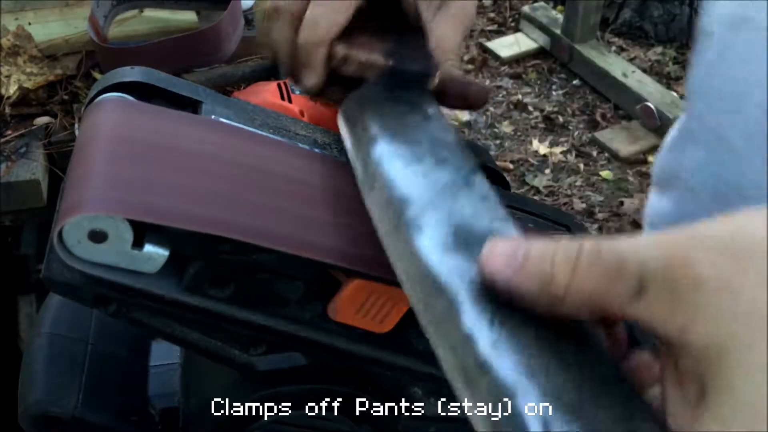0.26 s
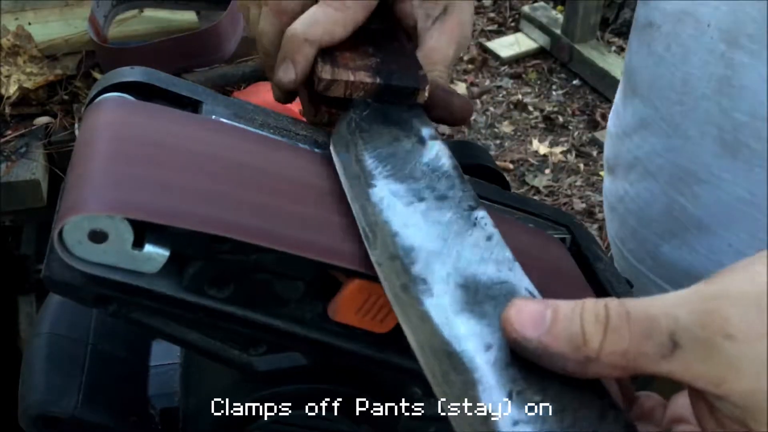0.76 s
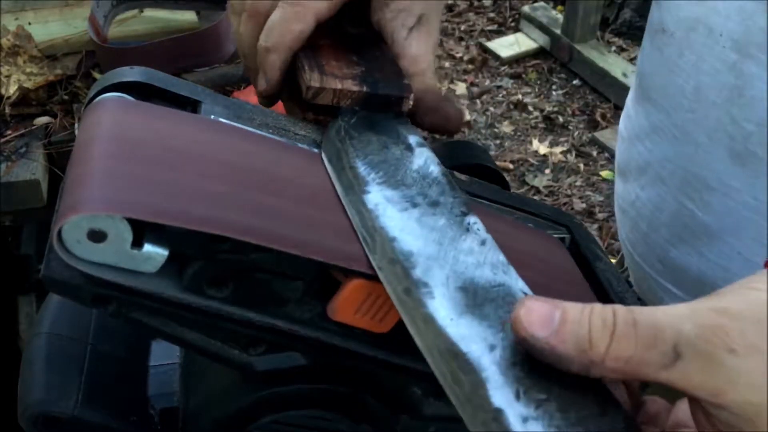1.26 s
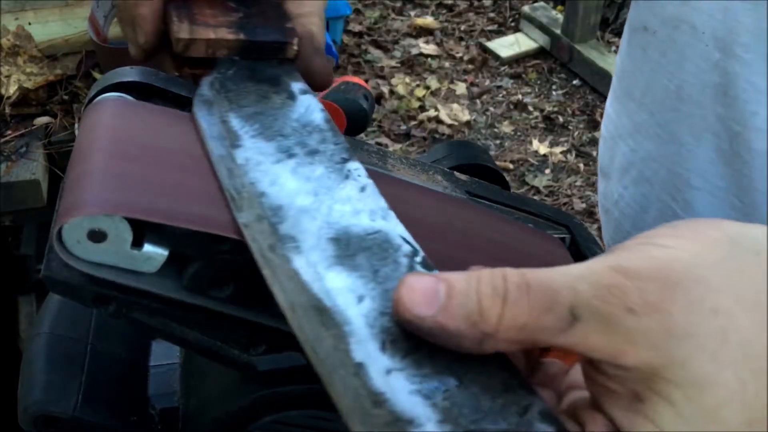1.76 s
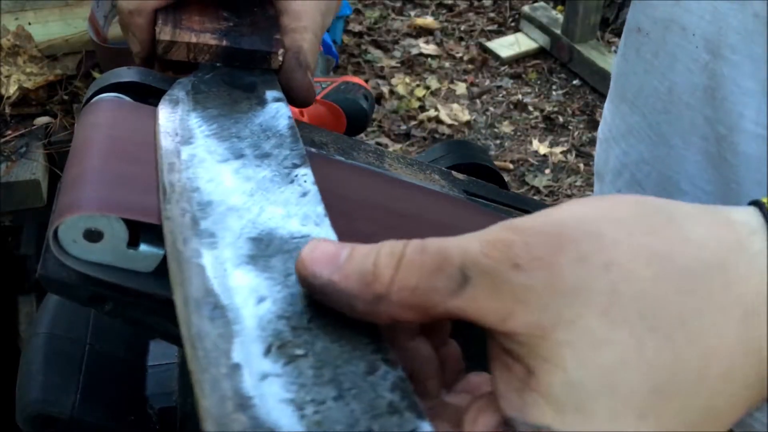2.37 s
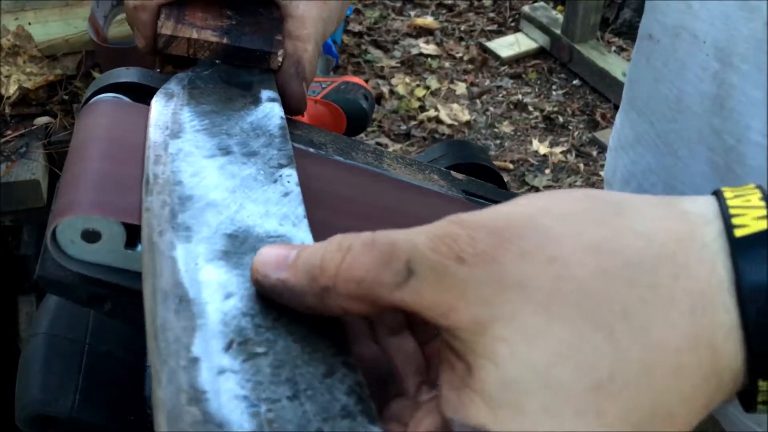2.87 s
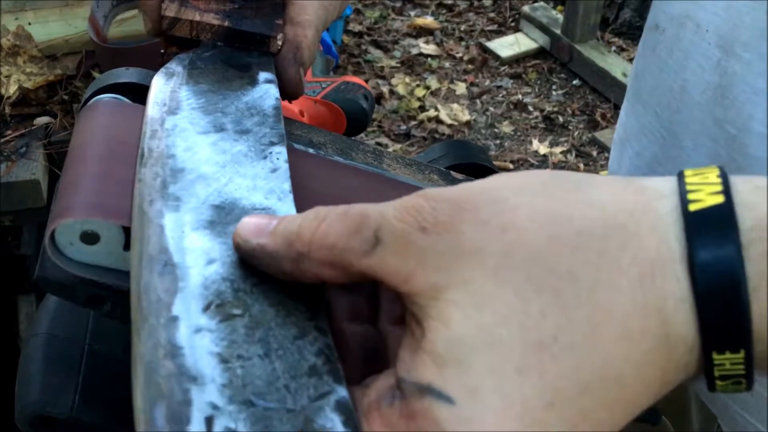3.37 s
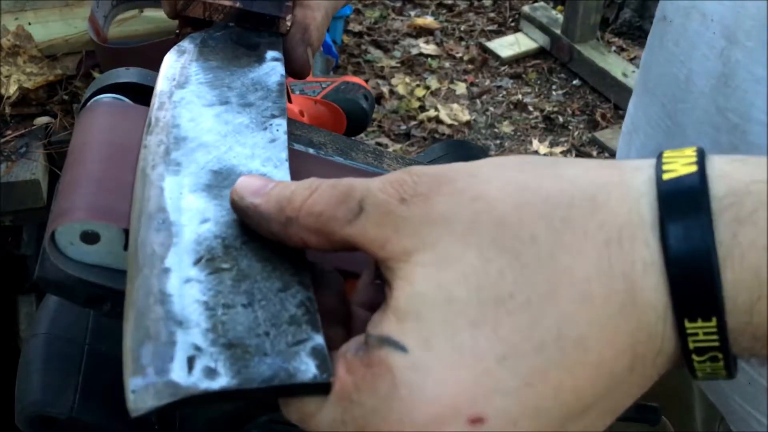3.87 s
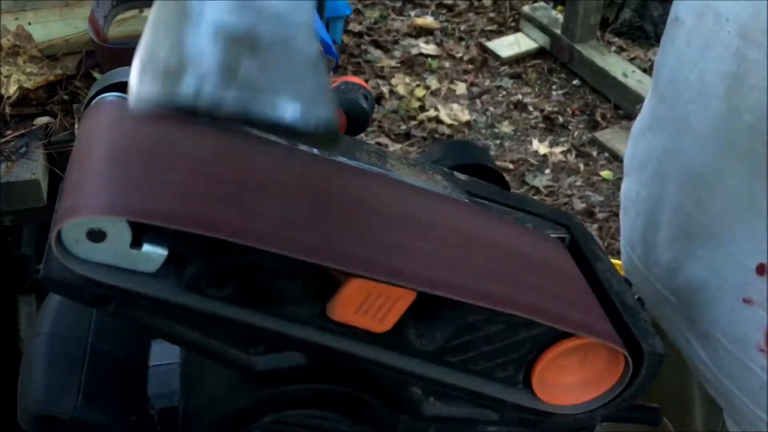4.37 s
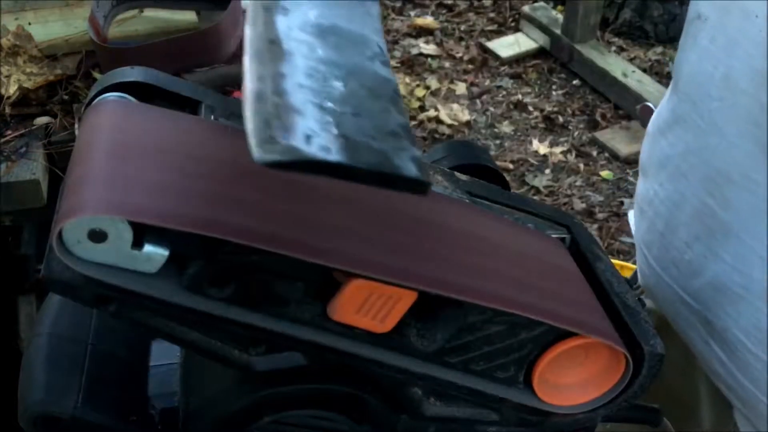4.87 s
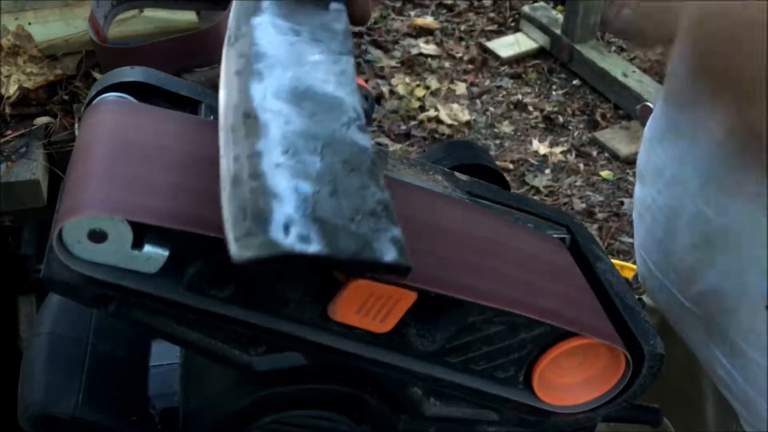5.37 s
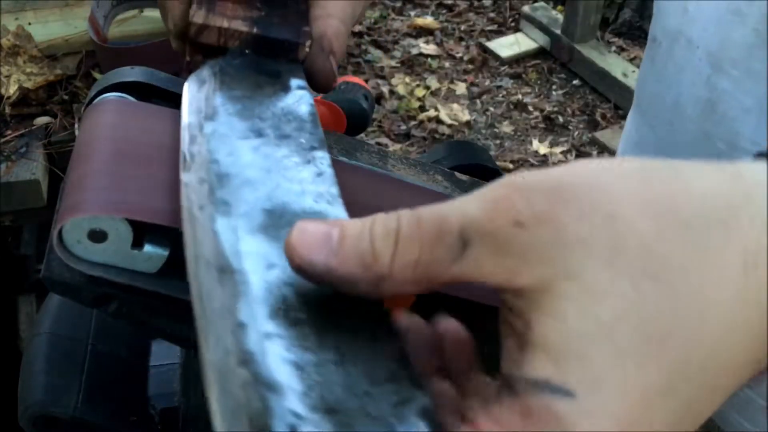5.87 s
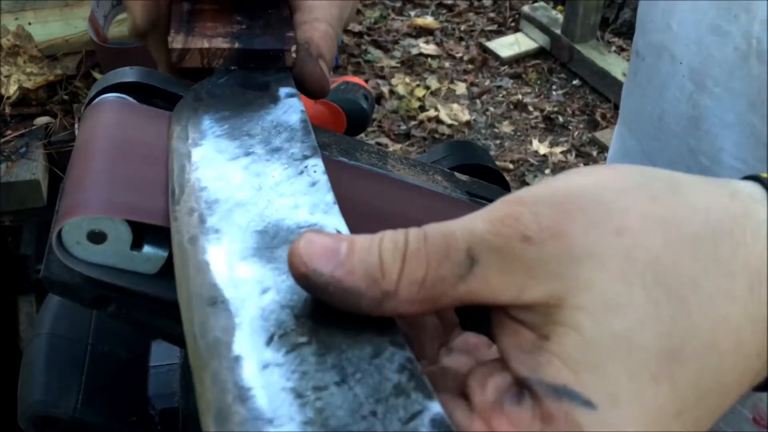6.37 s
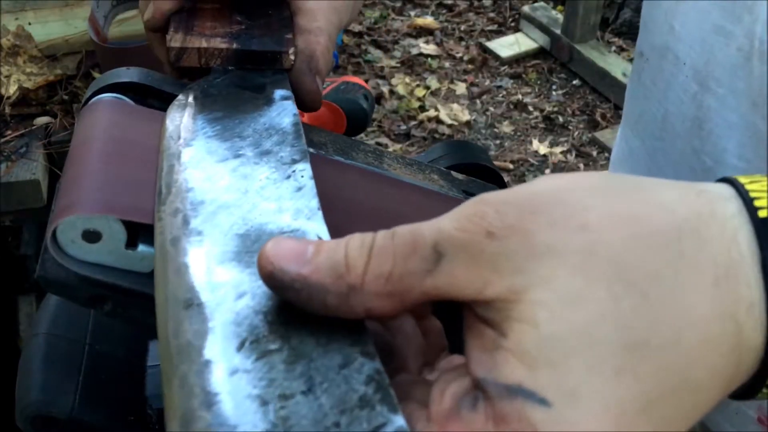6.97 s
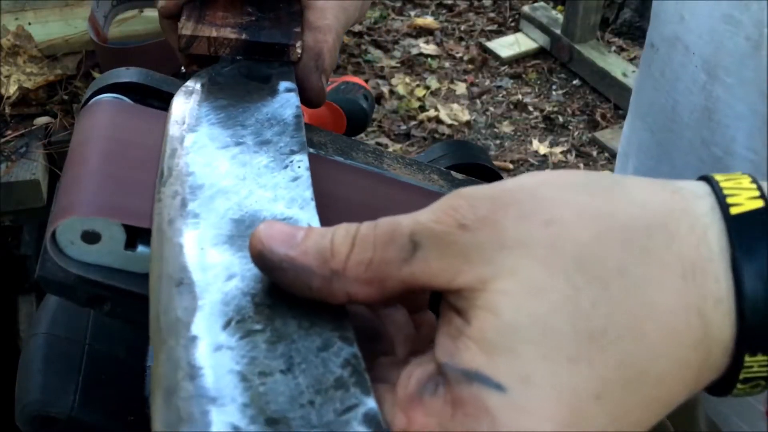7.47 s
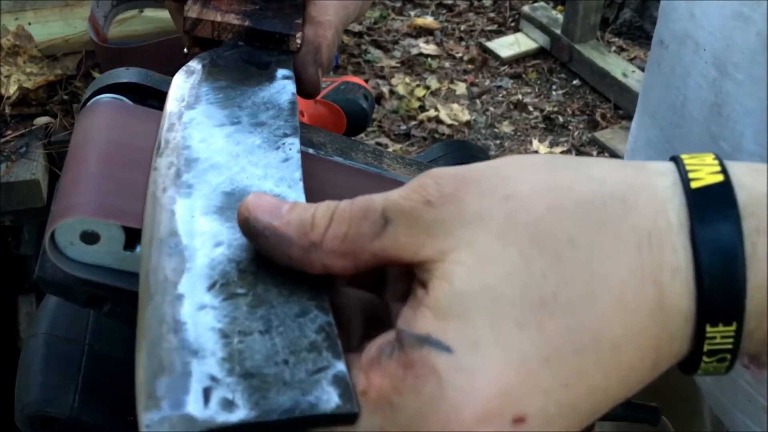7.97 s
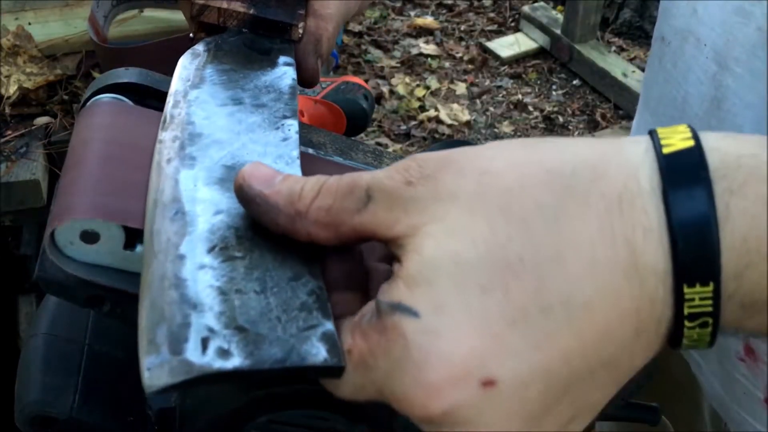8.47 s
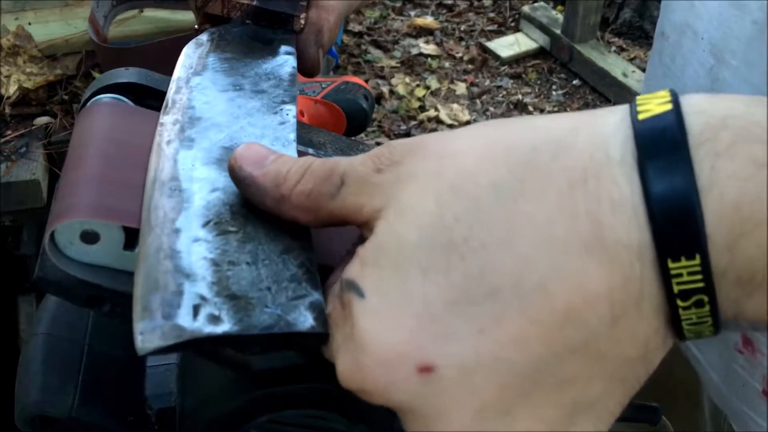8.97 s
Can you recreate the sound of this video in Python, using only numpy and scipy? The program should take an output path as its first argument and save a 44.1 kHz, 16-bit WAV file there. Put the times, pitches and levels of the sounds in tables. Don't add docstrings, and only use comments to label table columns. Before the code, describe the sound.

A handheld-size electric belt sander fills the close, dry outdoor sound with rushing air and a steady whine of motor, gears and toothed belt. Light contact gives a dull scratch; firmer pressure turns it into sharp, high hissing with a narrow steel ring, while pitch drops and the rush weakens. After a brief release back to free speed, the blade bears down again and the motor stays loaded to the end.

```python
import sys
import numpy as np
from scipy import signal
from scipy.fft import rfft, irfft, next_fast_len
from scipy.io import wavfile
from scipy.ndimage import uniform_filter1d

SR = 44100
rng = np.random.default_rng(int(sys.argv[2]) if len(sys.argv) > 2 else 0)


def transcribe(signal):
    frames = np.atleast_2d(signal).T
    limited = np.clip(frames, -1, 1)
    pcm = np.round(limited * 32767).astype(np.int16)
    wavfile.write(sys.argv[1], SR, pcm)


def ratio_of_db(decibels):
    return 10 ** (np.asarray(decibels, float) / 20)


N = 406602
SIZE = next_fast_len(N)
HZ = np.maximum(np.arange(SIZE // 2 + 1) * SR / SIZE, 1)

# (time
# [s], speed [turns/s], armature level [dB])
MOTOR_LOAD = [(0, 459.4, -48), (.5, 459.6, -49), (1.35, 459.4, -47.7), (1.7, 458.5, -48.3),
              (2.2, 459.0, -47.7), (2.95, 456.8, -50.2), (3.4, 452.5, -51.5), (3.95, 445.5, -54.2),
              (4.42, 444.3, -54.8), (4.85, 455.2, -51), (5.25, 458.7, -50.6), (5.7, 459.7, -50),
              (6.6, 459.5, -48), (7.0, 457.6, -49.8), (7.25, 457.6, -50.5), (7.6, 451.9, -51),
              (9.0, 440.5, -56), (9.22, 440.9, -55)]

# (time [s], level [dB])
FAN_LEVEL = [(0, -34.3), (.3, -35), (1.4, -35), (2.1, -34.5), (2.8, -35), (3.3, -37), (3.95, -38),
             (4.45, -39.5), (4.8, -36.3), (5.1, -36.5), (5.8, -34), (6.4, -35.5), (6.7, -34.5), (7.4, -35),
             (7.9, -37), (8.2, -37.5), (8.6, -39), (9.22, -38.5)]
# (frequency [Hz], density [dB per Hz])
FAN_SPECTRUM = [(250, -21), (420, -16.5), (560, -16.5), (800, -12.5), (1050, -6.5), (1400, -6), (1800, -2),
                (2300, -1), (3300, -4.5), (4200, -10.5), (6000, -11), (8000, -15), (11000, -41),
                (16000, -24.5)]
# (middle [s], length [s], gain [dB])
TREBLE_SWELLS = [
    (5.2, 1.4, 1),
    (8.1, 2.4, 2.2),
]

# (multiple of armature speed [ratio], level [dB])
ARMATURE_PARTIALS = [(1, 0), (5, -6), (6, -8), (7, -17), (10, -13), (11, -20), (12, -17), (15, -19)]
GEAR_PARTIALS = [(2.6125, 0), (3.6125, -6), (4.6125, -3), (5.225, -11), (5.6125, -12)]
TOOTH_PARTIALS = [(4.1667, 0), (3.75, -11), (5.8333, -7), (6.25, -7), (7.9167, -15), (8.3333, -5),
                  (10.4167, -17), (13.3333, -21)]
COMMUTATOR_PARTIALS = [
    (18, 0),
    (17, -9),
    (19, -6),
    (24, -9),
]
PULLEY_PARTIALS = [(.4167, -22), (.5833, -25), (1.09, -22)]
ROLLER_RATIOS = (.2268, .1134)
# (middle [s], length [s], gain [dB])
GEAR_SWELLS = [
    (5.3, 2.3, 2),
]
TOOTH_SWELLS = [(0, .5, 7.5), (.6, .4, 5), (1.5, 0.45, 3.6), (2.3, 1.3, 6), (3, .6, 7), (4.3, 0.85, 6.1),
                (5.4, .4, 6.5), (6.8, 1.6, 6), (7.5, 0.54, 6.2), (8.9, 2.3, 4)]
COMMUTATOR_SWELLS = [(.35, 1.2, 10), (1.1, 0.66, 9.3), (1.93, .5, 11), (2.7, .7, 7), (3.04, .3, 8),
                     (3.65, .5, 7), (4.8, 0.46, 12), (5.28, 0.68, 11), (5.95, 0.36, 13), (7.3, .9, 11),
                     (7.87, .4, 7.4), (8.95, .7, 5)]
WOBBLE_SWELLS = [(.6, 1.7, 11.4), (2.05, 1.9, 15), (3.3, 1.2, 5), (4.85, 1.4, 11), (6.2, 2.2, 12),
                 (9.1, 1.9, 9.8)]
ROLLER_SWELLS = [(.3, 4.6, 17), (3.5, 1.1, 12), (5.2, 3.8, 14), (8.1, 1.2, 9.8), (9.2, 2, 15)]

# (time [s], grit level [dB])
GRIT_LEVEL = [(0, -50.5), (1.3, -48.3), (1.55, -46), (1.8, -50.5), (2.4, -47), (3, -42.7), (3.4, -38.5),
              (4.1, -41.5), (4.46, -39.5), (4.58, -58), (4.8, -48), (5.7, -48.5), (6.3, -52), (6.8, -44.5),
              (7.05, -48.5), (8.1, -40), (8.6, -40.5), (9.22, -39)]
# (frequency [Hz], density [dB per Hz])
GRIT_BRIGHT_SPECTRUM = [(9500, -23), (10300, -1.5), (11300, 1), (12500, -2), (14000, -7), (16000, -13.5)]
GRIT_DULL_SPECTRUM = [(5000, -33), (7400, -10), (8600, 2.5), (9700, 2.5), (10400, -6.5), (11500, -29.5)]
# (middle [s], length [s], gain of dull hiss [dB])
BLADE_TILTS = [
    (1.3, .6, 2),
    (2.95, 0.58, 3),
    (6.75, 0.82, -2),
    (8.5, .5, 1),
]
# (time [s], frequency [Hz], level [dB])
STEEL_RING = [
    (2.6, 11500, -70),
    (2.85, 11460, -49),
    (3.3, 11500, -49),
    (3.6, 11200, -51),
    (4.5, 10800, -60),
    (4.56, 11000, -80),
]

# (frequency [Hz], density [dB per Hz])
DRONE_SPECTRUM = [(500, -17), (900, -8.5), (1200, 2), (1500, 3.5), (1900, 1), (2400, -12), (3500, -23.5)]
RUMBLE_SPECTRUM = [(20, -24), (35, -16), (70, -7.5), (150, -5), (250, -1.5), (400, -3.5), (600, -24.5)]
THUD_SPECTRUM = [(20, -20), (40, -4), (70, 4.5), (150, 5), (260, -21)]
# (middle [s], length [s], gain [dB])
DRONE_SWELLS = [(.3, 1.2, 5.8), (1.3, 1.8, 9.7), (2.2, .4, 11), (2.6, 0.31, 12.5), (3.4, 1.4, 9),
                (4.4, 0.36, 6), (6.9, 1.1, 12), (7.4, .6, 17.5), (7.68, 0.82, 16.3), (7.95, 0.41, 14),
                (8.9, 1.3, 8.5)]
RUMBLE_SWELLS = [(.9, 3.3, 4), (2.2, .7, 5.6), (4, 1.5, 7.2), (5.7, .6, 4), (6.5, 1.2, 4.6), (7.5, 2, 4)]
THUD_SWELLS = [
    (3.45, .7, 8.7),
    (4.2, .8, 9.1),
]
# (frequency [Hz], width [Hz], gain [dB])
RESONANCES = [(691, 130, 7), (2400, 300, 0), (2853, 180, -3), (3880, 460, 3), (3490, 820, -1),
              (5080, 130, -2.5), (4553, 320, 2.5), (10420, 510, -5), (8040, 640, -2), (1510, 440, -3),
              (8180, 150, 5), (6870, 160, 3.5)]

THINNED_MOMENTS = [1.285, 2.223, 2.586, 3.013, 3.119, 3.163, 4.677, 5.231, 7.173, 7.215, 7.429, 7.471,
                   7.620, 7.706, 8.133, 8.197, 8.303]
# (time [s], low edge [Hz], high edge [Hz], level [dB])
SIDE_PATCHES = [(.065, 6200, 7620, -55), (.065, 10250, 11800, -56), (.157, 8200, 9710, -54),
                (.622, 14410, 15900, -62), (1.504, 6800, 8310, -53), (1.551, 5600, 6960, -52),
                (2.294, 14410, 15900, -61), (2.874, 7540, 8950, -52), (5.080, 5600, 6930, -54),
                (6.218, 5600, 7560, -51), (6.404, 8160, 10380, -51), (6.589, 4590, 6290, -53),
                (6.589, 7490, 9070, -53), (6.613, 5580, 6910, -54), (6.613, 8850, 11020, -54),
                (6.961, 8180, 10360, -53), (7.657, 8160, 10360, -51), (7.657, 13670, 15160, -57),
                (8.215, 5600, 7560, -50), (8.215, 10940, 12450, -46), (8.656, 8850, 10450, -49)]


def curves(table):
    s, *columns = np.transpose(table)
    return [np.interp(np.arange(N) / SR, s, column) for column in columns]


def swells(rest_db, rows):
    t = np.arange(N) / SR
    rises = [db * np.cos(np.pi * np.clip((t - s) / length, -.5, .5)) for s, length, db in rows]
    return rest_db + np.max(rises, axis=0).clip(0) + np.min(rises, axis=0).clip(None, 0)


def walk(rate):
    steps = uniform_filter1d(np.repeat(rng.standard_normal(200), 8), 8)
    smooth = uniform_filter1d(steps, 8)
    return 1.3 * np.interp(np.arange(N) / SR * rate * 8, np.arange(len(steps)), smooth)


def colour(x, shape, shared_db, own_db, own_rate, count):
    hz, db = np.transpose(shape)
    spectrum = rfft(x, SIZE) * ratio_of_db(np.interp(np.log(HZ), np.log(hz), db, left=-70))
    octave_share = np.log(HZ / hz[0]) / np.log(hz[-1] / hz[0])
    place = np.clip(octave_share, 0, 1) * (count - 1)
    shared = shared_db * walk(7.6)
    out = 0
    for k in range(count):
        band = irfft(spectrum * np.maximum(1 - abs(place - k), 0), SIZE)[:N]
        out = out + band * ratio_of_db(shared + own_db * walk(own_rate))
    return out / np.std(out)


def fan(turns):
    air = rng.standard_normal(N) * (1 + .05 * np.sin(2 * np.pi * turns))
    rush = colour(air, FAN_SPECTRUM, shared_db=.25, own_db=1.25, own_rate=11, count=36)
    treble = irfft(rfft(rush, SIZE) * np.clip(HZ / 600 - 5.8, 0, 1), SIZE)[:N]
    treble_db = swells(-0.56, TREBLE_SWELLS)
    return ratio_of_db(curves(FAN_LEVEL)[0]) * (rush + (ratio_of_db(treble_db) - 1) * treble)


def whine(turns, partials):
    out = 0
    for multiple, db in partials:
        level = ratio_of_db(db - db / 8 * walk(4)) * np.sqrt(2)
        out = out + level * np.sin(2 * np.pi * (multiple * turns + rng.random()))
    return out


def shaft(turns):
    speed, armature_db = curves(MOTOR_LOAD)
    out = ratio_of_db(armature_db) * (whine(turns, ARMATURE_PARTIALS) + whine(turns, PULLEY_PARTIALS))
    slip_db = .2 * (459.5 - speed)
    return out + ratio_of_db(armature_db - slip_db) * whine(turns, [(2, -7)])


def gears(turns):
    weaker_db = curves(MOTOR_LOAD)[1] + 48.5
    return ratio_of_db(swells(-47, GEAR_SWELLS) + 1.09 * weaker_db) * whine(turns, GEAR_PARTIALS)


def toothed_belt(turns):
    return ratio_of_db(swells(-53, TOOTH_SWELLS)) * whine(turns, TOOTH_PARTIALS)


def commutator(turns):
    return ratio_of_db(swells(-63, COMMUTATOR_SWELLS)) * whine(turns, COMMUTATOR_PARTIALS)


def rollers(turns):
    wobble = ratio_of_db(swells(-80.5, WOBBLE_SWELLS)) * whine(turns, [(ROLLER_RATIOS[0], 0)])
    hum = ratio_of_db(swells(-84.5, ROLLER_SWELLS)) * whine(turns, [(ROLLER_RATIOS[1], 0)])
    return wobble + hum


def grit():
    level_db = curves(GRIT_LEVEL)[0]
    firmness_db = level_db + 51
    dull_db = swells(1.5, BLADE_TILTS) - 0.56 * firmness_db
    grains = rng.standard_normal(N) * ratio_of_db(1.1 * rng.exponential(size=N))
    bright = colour(grains, GRIT_BRIGHT_SPECTRUM, shared_db=.6, own_db=1.7, own_rate=6, count=14)
    dull = colour(grains, GRIT_DULL_SPECTRUM, shared_db=.5, own_db=1.7, own_rate=6, count=16)
    return ratio_of_db(level_db) * (bright + ratio_of_db(dull_db) * dull)


def steel_ring():
    hz, db = curves(STEEL_RING)
    a, b = uniform_filter1d(rng.standard_normal((2, N)), size=130)
    angle = 2 * np.pi * np.cumsum(hz) / SR
    mode = a * np.cos(angle) + b * np.sin(angle)
    return ratio_of_db(db) * mode / np.std(mode)


def drone():
    noise = colour(rng.standard_normal(N), DRONE_SPECTRUM, shared_db=.5, own_db=1.5, own_rate=6, count=8)
    return ratio_of_db(swells(-56.5, DRONE_SWELLS)) * noise


def rumble():
    noise = colour(rng.standard_normal(N), RUMBLE_SPECTRUM, shared_db=.3, own_db=1, own_rate=3, count=4)
    return ratio_of_db(swells(-65, RUMBLE_SWELLS)) * noise


def thud():
    noise = colour(rng.standard_normal(N), THUD_SPECTRUM, shared_db=.5, own_db=1, own_rate=3, count=2)
    return ratio_of_db(swells(-73.5, THUD_SWELLS)) * noise


def housing(noise):
    shape_db = sum(db / (1 + (2 * (HZ - hz) / width) ** 2) for hz, width, db in RESONANCES)
    return irfft(rfft(noise, SIZE) * ratio_of_db(shape_db), SIZE)[:N]


def scene():
    turns = np.cumsum(curves(MOTOR_LOAD)[0]) / SR
    noise = fan(turns) + grit() + steel_ring() + drone() + rumble() + thud()
    drive = shaft(turns) + gears(turns) + toothed_belt(turns) + commutator(turns) + rollers(turns)
    return np.tile(housing(noise) + drive, (2, 1))


def thin_moments(x):
    hop, top_hz = 941, 15000
    n, k = np.arange(2 * hop), np.arange(int(top_hz / SR * 2 * hop))
    window = np.sin(np.pi * (n + .5) / len(n))
    basis = window * np.cos(np.pi / hop * np.outer(k + .5, n + .5 + hop / 2))
    out = x.copy()
    for s in THINNED_MOMENTS:
        at = n + int(s * SR) - hop
        lines = basis @ x[at] * 2 / hop
        nearby = np.sqrt(uniform_filter1d(lines ** 2, size=60)) / np.std(lines)
        band_db = 6.2 + 1.2 * np.repeat(rng.standard_normal(len(k) // 32), 32)
        step = 2 * ratio_of_db(band_db) * np.std(lines) * nearby ** .65
        out[at] += (step * np.round(lines / step) - lines) @ basis
    return out


def side_patches():
    size, hop, offset = 2048, 1024, 802
    out, n = np.zeros(N), np.arange(size)
    hz = n[:hop + 1] * SR / size
    window = signal.windows.kaiser_bessel_derived(size, 4 * np.pi)
    for s, low_hz, high_hz, db in SIDE_PATCHES:
        band = (hz > low_hz) & (hz < high_hz)
        burst = irfft(rfft(rng.standard_normal(size)) * band)
        start = offset + hop * round((s * SR - offset) / hop - 1)
        out[n + start] += ratio_of_db(db) * burst / np.std(burst) * window
    return out


def band_limit(x):
    return signal.sosfilt(signal.butter(12, 16640, fs=SR, output="sos"), x)


def record(dry):
    below_top = HZ < 15740
    mid = irfft(rfft(thin_moments(dry[0]), SIZE) * below_top, SIZE)[:N]
    side = irfft(rfft(side_patches(), SIZE) * below_top, SIZE)[:N]
    return band_limit(np.array([mid + side, mid - side]))


dry = scene()
out = record(dry)
transcribe(out)
```